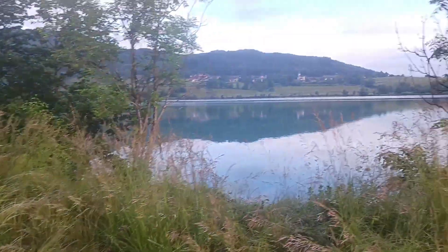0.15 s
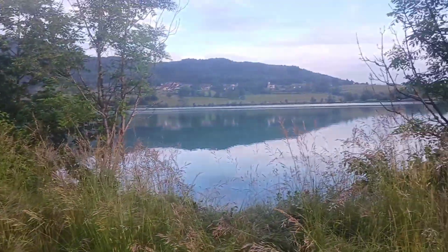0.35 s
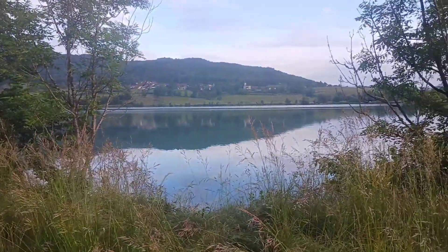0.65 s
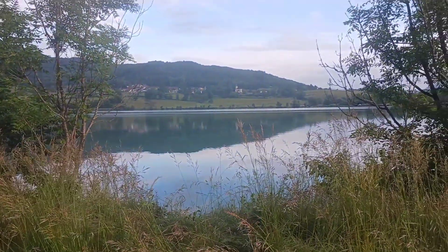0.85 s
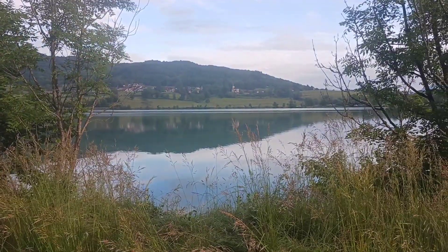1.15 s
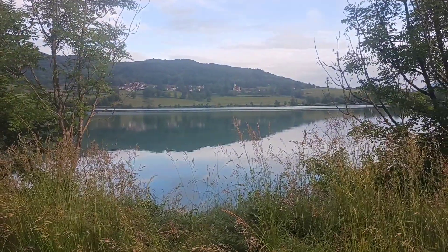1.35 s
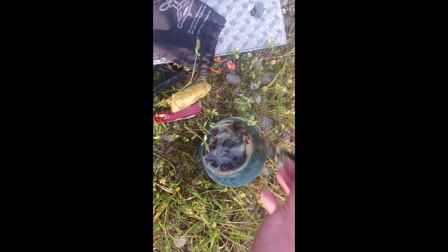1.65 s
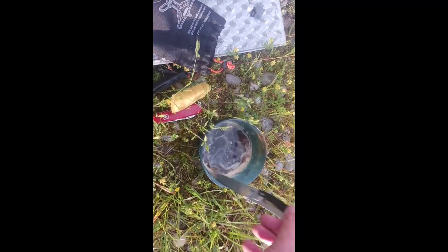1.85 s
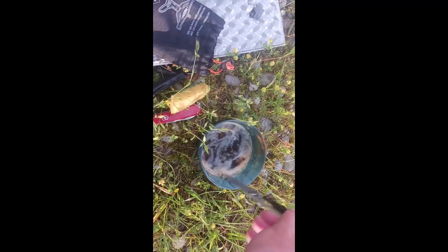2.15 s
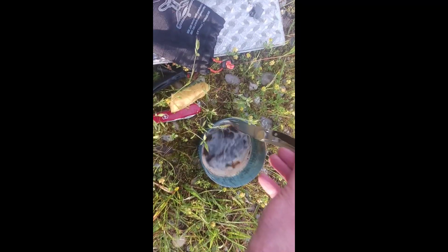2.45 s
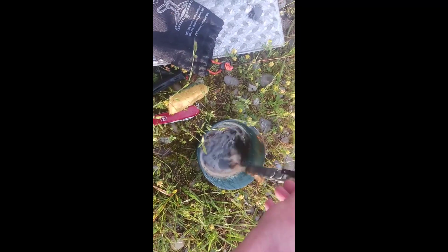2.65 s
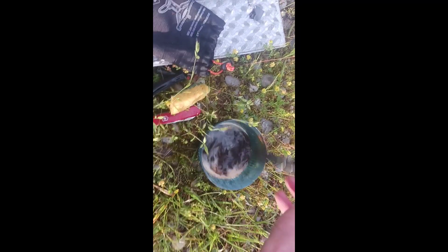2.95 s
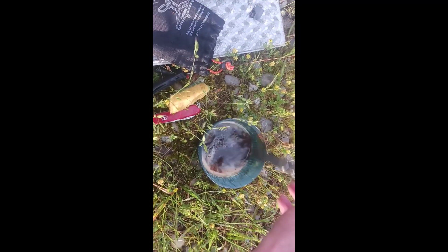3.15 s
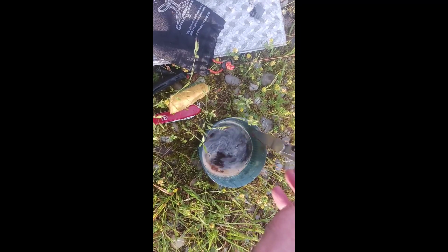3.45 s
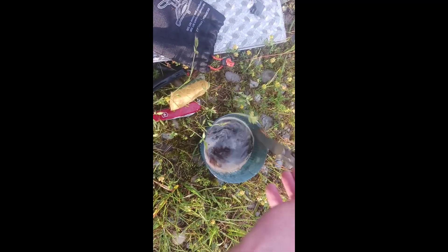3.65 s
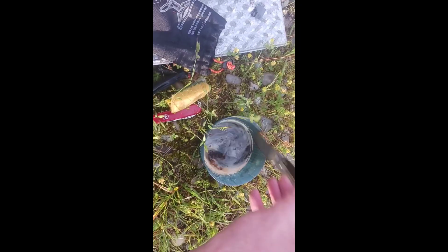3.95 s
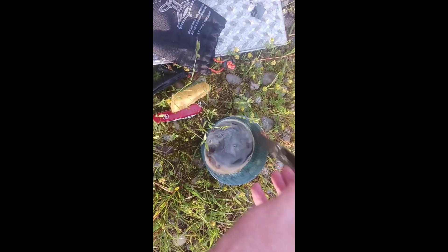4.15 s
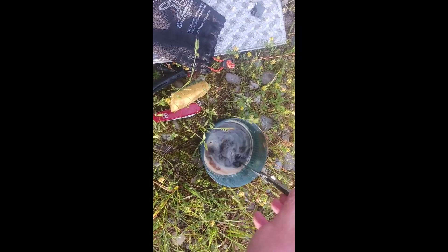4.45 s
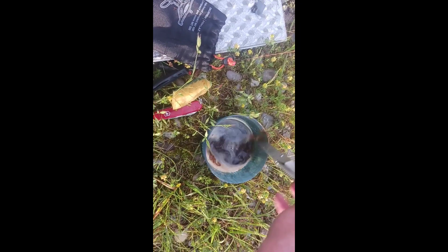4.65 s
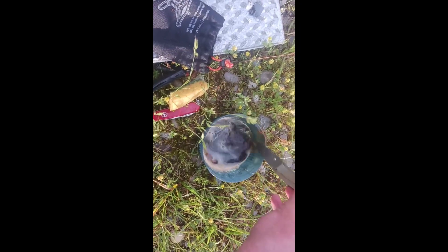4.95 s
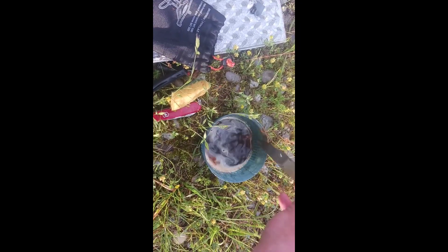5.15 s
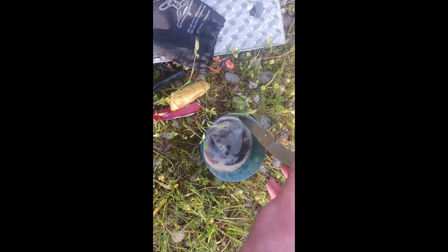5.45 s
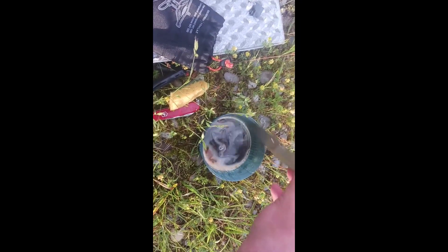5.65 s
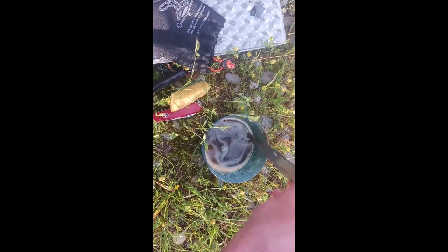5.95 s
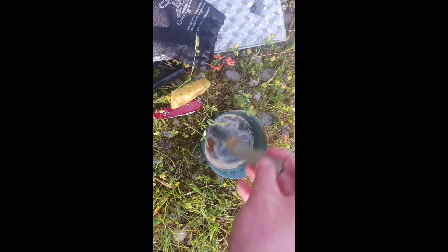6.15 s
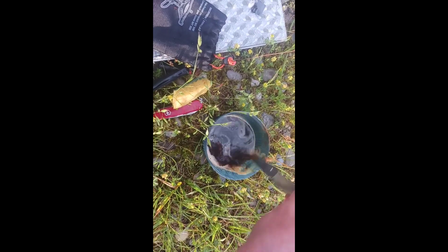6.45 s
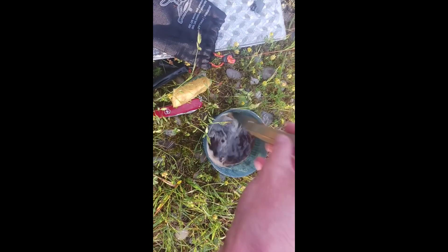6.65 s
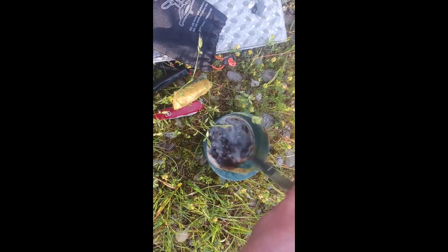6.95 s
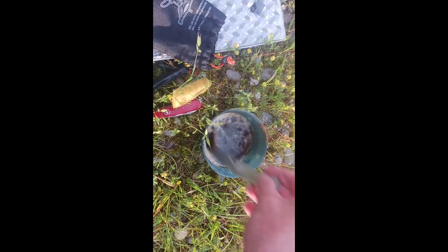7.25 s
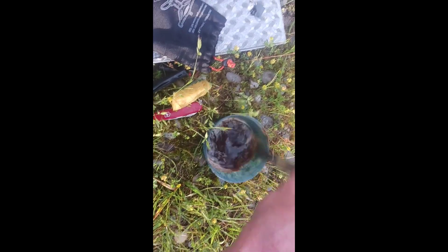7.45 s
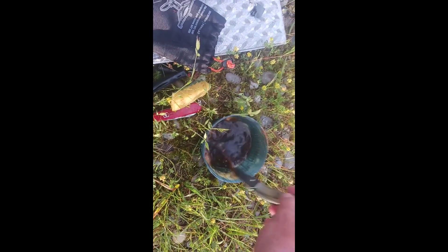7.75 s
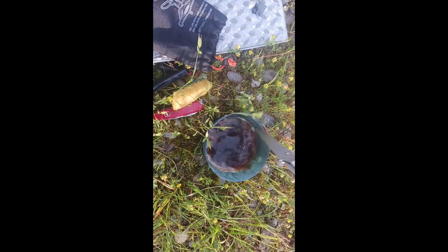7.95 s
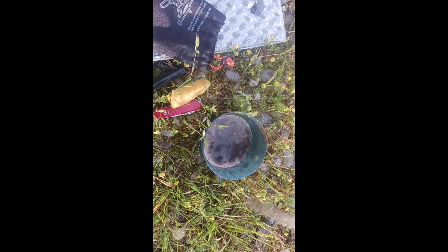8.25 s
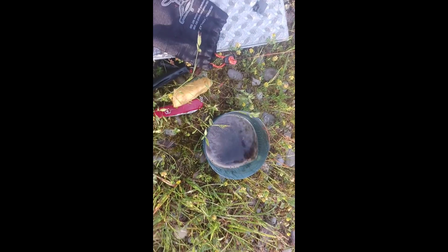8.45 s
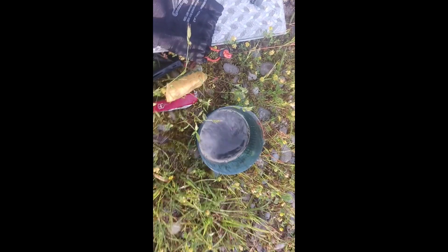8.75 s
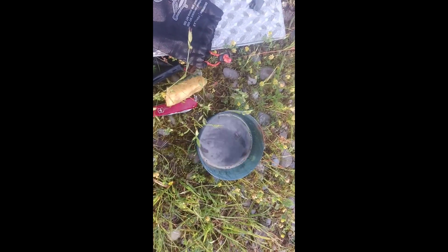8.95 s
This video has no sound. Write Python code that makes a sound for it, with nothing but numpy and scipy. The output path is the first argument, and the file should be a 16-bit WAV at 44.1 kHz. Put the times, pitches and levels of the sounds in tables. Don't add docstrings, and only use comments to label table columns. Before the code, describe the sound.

A soft lakeside ambience of wind and small whistling birds lasts about a second and a half, drops silent for an instant, then a steel spoon stirs a full plastic mug very close, slightly left. Gritty scrapes, damped knocks and short squeaky drags come in quick strokes, pausing briefly near four seconds. Behind, birds whistle and a far engine rumble grows; stirring stops just after eight seconds.

```python
import sys
import numpy as np
from scipy import signal
from scipy.io import wavfile
from scipy.ndimage import uniform_filter1d

SR = 44100
rng = np.random.default_rng(int(sys.argv[2]) if len(sys.argv) > 2 else 0)


def natural_amplitude(level_db):
    exponent = np.asarray(level_db, float) / 20
    return 10 ** exponent


def int16_out(signal):
    q = np.round(np.clip(np.atleast_2d(signal).T, -1, 1) * 32767)
    wavfile.write(sys.argv[1], SR, q.astype(np.int16))


N = 401310


def evened(x):
    return x / np.sqrt(np.mean(x ** 2) + 1e-20)


def read_spectrum(points, hz):
    f, value = np.transpose(points)
    return np.interp(np.log(hz + 1), np.log(f + 1), value)


def blend(table, at):
    key, *columns = np.transpose(table)
    return [np.interp(at, key, column) for column in columns]


def add(mix, s, sound):
    part = mix[..., round(s * SR):][..., :sound.shape[-1]]
    part += sound[..., :part.shape[-1]]


SCENE_CHANGE = (1.442, 1.471)
# time in seconds, rumble level in dB, wash level in dB.
AIR = [
    (1.47, -67, -71.5),
    (3.5, -66.5, -68.5),
    (4.4, -62, -67),
    (5.6, -59.5, -66.5),
    (6.2, -57.5, -63),
    (7.5, -53.5, -59),
    (8.3, -56, -63.5),
    (9.1, -55.5, -57.5),
]
# pitch in Hz, density in dB per Hz.
SHORE = [(20, -14), (70, 2.5), (400, -16), (624, -21), (962, -10), (2410, -25), (3520, -19), (8000, -31.5)]
SHORE_DB = -65.5
# pitch in Hz, density in dB per Hz.
RUMBLE = [(20, -19), (70, 3.5), (113, 4.5), (151, -0.5), (254, 1), (405, -17), (700, -27), (1100, -45)]
# pitch in Hz, density in dB per Hz.
WASH = [(290, -35), (500, -6.5), (760, -32), (1000, -6), (2600, -6), (7980, -19.5), (9600, -25.5),
        (16000, -14.5)]
# pitch in Hz, density in dB per Hz.
GRASS = [(2500, -18), (4000, -10), (5300, -2), (6500, -12.5), (8000, -8.5), (10000, -24), (13000, -14),
         (16500, -35)]
# start in seconds, length in seconds, level in dB.
RUSTLES = [
    (0.01, 0.61, -65.5),
    (1.287, 0.51, -69),
    (6.301, 0.1, -54.5),
    (7.978, 0.3, -63.5),
    (8.382, 0.37, -54.5),
    (8.894, 0.22, -65.5),
]
# pitch in Hz, left-right likeness from -1 to 1.
LIKENESS = [(60, 0.63), (180, 0.92), (550, 0.16), (1650, -0.26), (4970, 0.062), (15000, -0.13)]
# pitch in Hz, left over right in dB.
LEFT_LEAN = [(30, 5), (125, 1.5), (300, 3), (1000, 4.5), (2500, 10), (6000, 4), (15000, 6.5)]


def meadow():
    frames, hz = N // 256 + 5, np.fft.rfftfreq(1024, 1 / SR)
    a, b, c, d, wide, narrow = rng.standard_normal((frames, 513, 6)).T
    wide = evened(uniform_filter1d(uniform_filter1d(wide, 14, 0), 30, 1))
    narrow = evened(uniform_filter1d(narrow, 9, 1))

    t = np.arange(frames) * 256 / SR
    at_shore = t < SCENE_CHANGE[1]
    rumble_db, wash_db = blend(AIR, t)
    grass = np.zeros(frames)
    for start, length, db in RUSTLES:
        grass += natural_amplitude(db) * np.sin(np.pi * np.clip((t - start) / length, 0, 1)) ** 2
    levels = natural_amplitude(SHORE_DB) * at_shore, natural_amplitude(rumble_db) * ~at_shore, natural_amplitude(wash_db) * ~at_shore, grass
    power = 0
    for colour, level in zip((SHORE, RUMBLE, WASH, GRASS), levels):
        shape = evened(natural_amplitude(read_spectrum(colour, hz))) / np.sqrt(len(hz))
        power = power + np.outer(shape, level) ** 2
    drift = natural_amplitude(2.67 * wide + 0.46 * narrow * (hz < 350)[:, None])

    same = np.clip(read_spectrum(LIKENESS, hz), -1, 1)[:, None]
    left = a + 1j * b
    right = same * left + np.sqrt(1 - same ** 2) * (c + 1j * d)
    lean = natural_amplitude(np.outer(read_spectrum(LEFT_LEAN, hz) / 2, 1 - 0.52 * at_shore))
    z = np.array([left * lean, right / lean]) * np.sqrt(power) * drift
    return signal.istft(z, nperseg=1024, noverlap=768)[1][:, :N]


# pitch in Hz, level over the rumble in dB.
DRONE = [
    (62, -11.5),
    (116, -11),
    (190, -15.5),
    (255, -10.5),
]


def drone():
    t = np.arange(N) / SR
    slow = uniform_filter1d(uniform_filter1d(rng.standard_normal((len(DRONE), 2, N)), 5000), 5000)
    tones = np.zeros(N)
    for (hz, db), (pitch, strength) in zip(DRONE, evened(slow)):
        phase = 2 * np.pi * np.cumsum(hz * (1 + 0.05 * pitch)) / SR
        tones += natural_amplitude(db + 3.2 * strength) * np.sin(phase)
    rumble_db, _ = blend(AIR, t)
    return natural_amplitude(rumble_db) * (t > SCENE_CHANGE[1]) * tones * natural_amplitude([[0.8], [-0.8]])


def whistle(length, hz, db):
    u = np.linspace(0, 1, int(length * SR))
    pitch = np.polyval(np.polyfit([0, 0.5, 1], hz, 2), u)
    return natural_amplitude(db) * np.sin(2 * np.pi * np.cumsum(pitch) / SR) * signal.windows.tukey(len(u), 0.4)


# start in seconds, length in seconds, first pitch in Hz, last pitch in Hz, level in dB.
GLIDES = [(.01, 0.016, 4420, 4080, -60.5), (0.11, 0.025, 3580, 3520, -64), (0.2, 0.045, 3070, 3050, -66),
          (0.44, 0.025, 2900, 2730, -66), (0.442, 0.078, 4170, 4520, -66),
          (0.512, 0.049, 3250, 3064, -60.5), (0.559, 0.11, 3410, 3424, -64.5),
          (0.838, 0.043, 3730, 3380, -61.5), (0.863, 0.11, 4620, 4100, -70),
          (0.909, 0.083, 1915, 2124, -67.5), (0.986, 0.087, 3680, 3375, -60.5),
          (1.039, 0.033, 1950, 2125, -66), (1.239, 0.1, 1866, 1730, -69), (4.221, 0.16, 4370, 3900, -73),
          (0.291, 0.04, 2820, 2640, -66), (0.372, 0.069, 4300, 4200, -75), (0.505, 0.04, 4350, 4100, -68),
          (0.65, 0.05, 3170, 2780, -77), (0.719, 0.12, 2855, 2530, -75), (4.178, .025, 5800, 6500, -70),
          (.825, 0.023, 4970, 5650, -72), (0.954, 0.082, 4480, 4250, -77),
          (1.312, 0.059, 4370, 5460, -66.5), (1.362, 0.065, 4500, 4280, -72),
          (3.885, 0.03, 2440, 2880, -73), (4.026, 0.038, 3140, 2710, -56.5), (8.736, 0.05, 3630, 3610, -68),
          (8.806, 0.059, 4100, 3780, -62), (3.793, 0.012, 2700, 2860, -59), (5.165, 0.04, 3040, 3190, -58),
          (5.793, 0.12, 2600, 2730, -60.5), (8.165, 0.048, 3630, 3300, -59.5),
          (8.494, 0.052, 3270, 3470, -61), (8.65, 0.031, 3160, 3050, -58)]
# start in seconds, length in seconds, first, middle and last pitch in Hz.
BENDS = [(3.853, 0.024, 2250, 2870, 2720), (3.95, 0.064, 2950, 3230, 3180),
         (4.458, 0.039, 3300, 3230, 2980), (4.497, 0.092, 3150, 3400, 3340),
         (4.68, 0.076, 3320, 2960, 2700), (6.249, 0.052, 2710, 2680, 2400),
         (7.544, 0.062, 3350, 2800, 2560), (7.85, 0.053, 2080, 2405, 2060),
         (7.986, 0.057, 2800, 2840, 2520), (8.038, 0.061, 2420, 2880, 2990),
         (8.22, 0.077, 3290, 2940, 2480), (8.437, 0.093, 3460, 3140, 3300),
         (8.617, 0.032, 2190, 2300, 2740), (8.635, 0.072, 2680, 2710, 2290),
         (8.785, 0.045, 3650, 3500, 2500), (8.99, 0.051, 3790, 3690, 3680), (9.048, 0.11, 3230, 2990, 2670)]
# time in seconds, level in dB.
NEAR_BIRD = [(3.8, -64), (4.5, -66), (7.6, -64.5), (8.05, -60), (8.65, -61), (9.1, -67.5)]


def birds():
    near, distant, chorus = np.zeros((3, N))
    for s, length, first, last, db in GLIDES:
        add(distant, s, whistle(length, [first, (first + last) / 2, last], db + 3.5))
    for s, length, *hz in BENDS:
        add(near, s, whistle(length, hz, blend(NEAR_BIRD, s)[0] + 5))
    for when, long, high, bend, glide, loud in rng.random((300, 6)):
        hz = (2600 + 2800 * high) * np.array([1, 0.97 + 0.08 * bend, 0.85 + 0.25 * glide])
        add(chorus, when * N / SR, whistle(0.02 + 0.05 * long, hz, -80 + 8 * loud))

    t = np.arange(SR // 2) / SR
    echoes = rng.standard_normal((2, len(t))) * natural_amplitude(-60 * t / 0.25) * (t > 0.008)
    echoes /= np.linalg.norm(echoes[0])
    far = natural_amplitude(-5.5) * near + natural_amplitude(-5.0) * distant + chorus
    wet = signal.fftconvolve(far[None], echoes, axes=1)[:, :N]
    flutter = 1 + 0.9 * evened(uniform_filter1d(rng.standard_normal(N), 220))
    direct = near + natural_amplitude(-10.5) * flutter * distant
    return direct * natural_amplitude([[3], [-6]]) + natural_amplitude([[1.5], [-3]]) * wet


def rub(mix, s, length, db, first_hz, last_hz, width_hz, lean_db):
    u = np.linspace(0, 1, 6000)[:int(length * SR)] * 6000 / (length * SR)
    r = np.exp(-np.pi * width_hz / SR)
    noise = signal.lfilter([1], [1, -2 * r, r * r], rng.standard_normal((4, 6400)))
    a, b, c, d = noise[:, 400:400 + len(u)]
    turn = np.exp(2j * np.pi * np.cumsum(first_hz + (last_hz - first_hz) * u) / SR)
    near, other = evened(((a + 1j * b) * turn).real), evened(((c + 1j * d) * turn).real)
    far = natural_amplitude(-lean_db) * (0.43 * np.roll(near, 2) + 0.58 * other)
    swell = natural_amplitude(db) * np.sin(np.pi * np.clip(u, 0, 1)) ** 0.5
    add(mix, s, swell * np.array([near, far]))


# start in seconds, length in seconds, level in dB, pitch in Hz, left over right in dB.
CRUNCHES = [(1.477, 0.036, -51.5, 12700, 0), (2.881, 0.0036, -36, 14100, 9), (2.982, 0.037, -50, 12500, 8),
            (3.217, 0.006, -39.5, 7530, 13), (3.251, .02, -52, 13600, 11), (4.77, .04, -68, 12600, 12),
            (4.933, 0.023, -50, 13300, 9), (4.98, .009, -59, 14000, 9), (5.05, 0.017, -34, 14300, -1),
            (5.23, 0.037, -51, 12400, 6.5), (5.327, 0.004, -36, 13800, 5), (5.436, 0.012, -45, 13500, 14),
            (5.522, 0.023, -41.5, 9260, 7), (5.726, 0.024, -48, 13700, 11.5),
            (5.879, 0.0062, -35, 12400, 15), (5.889, 0.015, -49, 13700, 13),
            (6.023, 0.04, -47.5, 12200, 13), (6.647, 0.06, -53, 12500, 14), (6.887, 0.0099, -54, 12000, 11),
            (6.925, 0.02, -50, 13900, 12), (6.953, 0.011, -45, 11800, 14), (7.098, 0.021, -39.5, 12150, 6),
            (7.133, 0.0041, -44, 10700, 7), (7.313, 0.012, -46.5, 7640, 15),
            (7.506, 0.06, -47.5, 12400, 11), (7.62, .012, -51, 6500, 7), (7.632, 0.012, -38.5, 13100, 11),
            (7.633, 0.014, -47, 7830, 13)]
# start in seconds, length in seconds, level in dB, first pitch in Hz, last pitch in Hz.
SINGS = [(1.72, 0.07, -54, 5700, 5600), (2.16, 0.17, -45, 2000, 2476), (2.162, 0.18, -56, 2740, 2770),
         (2.204, 0.14, -50, 3750, 3940), (2.166, 0.18, -51.5, 1550, 1723),
         (2.247, 0.073, -40.5, 5350, 5330), (2.704, .022, -36.5, 4900, 5400),
         (3.164, 0.052, -44, 5300, 5450), (3.28, 0.081, -46.5, 2450, 2380), (3.36, 0.06, -67, 4650, 4560),
         (3.473, 0.077, -74, 4650, 4560), (3.515, 0.022, -45.5, 2830, 2850),
         (4.182, 0.043, -60, 2800, 2810), (5.114, 0.071, -61, 2750, 2800), (5.686, 0.039, -51, 2850, 2740),
         (6.542, 0.094, -51, 5600, 5550), (6.567, 0.097, -54, 2800, 2760), (7.04, 0.03, -55, 6200, 5070),
         (7.278, 0.033, -57, 5400, 4190)]


def grounds():
    out = np.zeros((2, N))
    for s, length, db, hz, lean_db in CRUNCHES:
        rub(out, s, length, db, hz, hz, 0.28 * hz, lean_db)
    for row in SINGS:
        rub(out, *row, width_hz=320, lean_db=3.2)
    return out


def ring(modes, spot, low_hz, high_hz, damping):
    t = np.arange(1200) / SR
    out = np.zeros(len(t))
    for (hz, width, db), (favour_db, detune) in zip(modes, spot):
        decay = np.sqrt(width) * np.exp(-np.pi * width * damping * t)
        out += natural_amplitude(db + favour_db) * decay * np.sin(2 * np.pi * hz * (1 + detune) * t)
    out = signal.sosfilt(signal.butter(8, low_hz, "high", fs=SR, output="sos"), out)
    out = signal.sosfilt(signal.butter(4, high_hz, fs=SR, output="sos"), out)
    return out / np.linalg.norm(out)


def shares(bottom_db, spoon_db, grit_db):
    bottom, spoon, grit = natural_amplitude(bottom_db), natural_amplitude(spoon_db), natural_amplitude(grit_db)
    rest = np.clip(1 - bottom ** 2 - spoon ** 2 - grit ** 2, 0.04, 1)
    return np.array([bottom, np.sqrt(rest), spoon, grit])


# level in dB, likeness to the near port from 0 to 1.
FAR_PORT = [
    (-7.5, 0.54),
    (-13.5, 0.47),
    (-7.5, 0),
    (-10.5, 0),
]


def both_ports(near, other, part):
    db, same = FAR_PORT[part]
    far = same * np.roll(near, 2) + np.sqrt(1 - same ** 2) * other
    return np.array([near, natural_amplitude(db) * far])


# pitch in Hz, width in Hz, level in dB.
BOTTOM = [(1150, 150, -4), (1550, 170, 0), (1400, 600, -4)]
# pitch in Hz, width in Hz, level in dB.
WALL = [(1950, 140, -4), (2400, 130, -1), (2750, 120, 3), (3100, 200, -8), (2500, 1100, -4)]
# pitch in Hz, width in Hz, level in dB.
SPOON = [(3770, 200, -3), (4550, 260, -2), (5480, 220, -1.5), (6200, 350, -7), (7300, 500, -14),
         (5000, 1800, -3)]
# pitch in Hz, width in Hz, level in dB.
GRIT = [(10600, 1000, -8), (12300, 800, -3), (13500, 800, 0), (15100, 900, 1)]
PARTS = (BOTTOM, WALL, SPOON, GRIT)


def strike(mix, s, near, other, gains, spot, parts, damping, low_hz):
    high_hz = (6850, 8640, 8330, 15460)
    for k, modes in enumerate(parts):
        lowest_hz = max(low_hz, 0.58 * PARTS[k][0][0])
        body = ring(modes, spot[k], lowest_hz, high_hz[k], damping)
        add(mix, s, signal.fftconvolve(gains[k] * both_ports(near, other, k), body[None], axes=1))


# spot number, share of bottom in dB, share of spoon in dB.
BLOW_SPOTS = [
    (0, 2, -25.5),
    (1, -5.5, -3.5),
    (2, -21, -10.5),
    (3, -28, 6.5),
]
# start in seconds, blow in dB, strongest bottom mode in Hz, strongest wall mode in Hz,
# spot 0-3.
KNOCKS = [(1.5332, -20, 1710, 2790, 1.9), (2.165, -23, 1860, 2700, 2.2), (2.3116, -25.5, 1540, 2320, 0.99),
          (2.6356, -26, 1530, 2370, 0.91), (2.8834, -6.5, 1290, 2730, 0.95), (2.969, -29, 1540, 2350, 0.8),
          (3.0797, -19, 1520, 2400, 1.06), (3.6191, -26, 1080, 2440, 1.95),
          (4.382, -11.5, 1440, 2785, 2.57), (4.3823, -18, 1330, 2730, .15), (5.0296, -25, 1190, 2570, 3.8),
          (5.0961, -31.5, 1320, 2800, .3), (5.3277, -14, 1455, 2670, 1.05), (5.881, -7, 1480, 2640, 0.85),
          (5.9034, -34, 1490, 2000, 0.38), (6.4072, -19.5, 1010, 2650, 0.54),
          (6.4103, -10.5, 1396, 2560, 0.964), (7.3072, -22, 1220, 2000, 0.1),
          (7.3351, -18, 1100, 2520, 1.43), (7.355, -32, 1880, 2250, 2), (7.5168, -21.5, 1260, 2720, 0.88),
          (7.5485, -32, 1160, 2770, .1), (7.6999, -33, 1190, 2430, 0.14), (7.8265, -30, 1210, 2150, 0.14)]
# start in seconds, blow in dB, spot 0-3.
TICKS = [(0.798, -49, 1.5), (2.568, -36.5, 0.09), (2.7114, -28, 3.5), (3.2, -29, 3.5), (2.594, -32, 0.38),
         (2.762, -26.5, 1.04), (3.411, -29, 2.53), (3.4204, -26, 2.8), (3.5187, -43, 2), (4.446, -34, .05),
         (4.662, -32.5, 1.2), (5.3055, -35.5, 0.045), (5.396, -34, 2.48), (5.529, -52, 3.5),
         (5.8002, -32.5, 2.54), (6.1865, -33.5, 2.52), (6.5324, -37.5, .05), (7.379, -30, 0.44),
         (6.81, -33.5, 2.45), (7.003, -35.5, 0.89), (7.169, -36, 0.3), (7.206, -45, 3.6),
         (7.4753, -28, 0.38), (7.7665, -32.5, 1.5), (6.613, -31, 2.66)]
# start in seconds, blow in dB, spot 0-3.
CHATTER = [(1.6087, -40.5, 0.17), (2.399, -33, 2), (3.1067, -28, 1.8), (3.1835, -35, 3.6),
           (3.278, -27, 2.5), (3.338, -31, 1.7), (3.4405, -46, 2), (3.5533, -49, 2), (4.3863, -24.5, 1.94),
           (4.417, -50, 0.55), (4.558, -37, 2.36), (4.5704, -46, 3.1), (4.579, -40, 3), (4.5858, -36, 1.6),
           (4.5916, -35, 1.4), (4.5976, -33, 1.1), (4.604, -35, 2), (4.611, -27.5, 1.7), (4.617, -27, 1.23),
           (4.6204, -39, 3.1), (4.7248, -39.5, 2.27), (4.853, -34, 1.4), (4.8582, -36, 1.4),
           (4.866, -31, 1.6), (4.875, -40, 2), (5.36, -34, 2.6), (5.428, -29, 1.7), (5.8902, -35, 1.9),
           (6.4177, -49, 3.5), (6.782, -49, 3.4), (6.942, -40, 2.6), (6.958, -35, 2.8), (7.5128, -24.5, 2),
           (7.5227, -21, 2.1), (7.611, -40, .2), (7.402, -45, 1.9)]
USUAL_BOTTOM_HZ, USUAL_WALL_HZ = 1540, 2650
ALL_BLOWS = KNOCKS + [(s, db, USUAL_BOTTOM_HZ, USUAL_WALL_HZ, spot) for s, db, spot in TICKS + CHATTER]
# pitch in Hz, width in Hz, level in dB.
KNOCK_CRACK = (4360, 340, 1)
KNOCK_GRIT_DB = -18
# start in seconds, level in dB.
JOLTS = [
    (2.8834, -54),
    (4.382, -47.5),
    (4.444, -57),
    (5.3267, -64),
    (5.881, -52.5),
    (6.409, -44.5),
    (7.335, -57),
    (7.7, -58),
]


def knocks():
    out, t = np.zeros((2, N)), np.arange(600) / SR
    rattle = rng.standard_normal((len(ALL_BLOWS), 2, 600)) * natural_amplitude(-60 * t / 0.04) * 0.075
    spots = rng.standard_normal((len(ALL_BLOWS), 4, 7, 2)) * [2, 0.01]
    for (s, db, bottom_hz, wall_hz, where), (near, other), spot in zip(ALL_BLOWS, rattle, spots):
        bottom_db, spoon_db = blend(BLOW_SPOTS, where)
        grit_db = spoon_db + KNOCK_GRIT_DB + 0.3 * (db + 10)
        near = near + (t == 0) * 1.9
        gains = natural_amplitude(db + 11) * shares(bottom_db, spoon_db, grit_db) / np.linalg.norm(near)
        bottom = [(bottom_hz, 110, 7)] + BOTTOM[::2]
        wall = [(wall_hz, 120, 4)] + WALL[:2] + WALL[-1:]
        parts = bottom, wall, [KNOCK_CRACK] + SPOON, GRIT
        low_hz = max(0.83 * bottom_hz, 930)
        strike(out, s, near, 2.4 * other, gains, spot, parts, damping=1.5, low_hz=low_hz)
    thump = np.sin(2 * np.pi * 480 * t) * natural_amplitude(-60 * t / 0.022)
    for s, db in JOLTS:
        add(out, s, natural_amplitude(db) * thump * natural_amplitude([[3], [-3]]))
    return out


# lie number, shares of bottom, spoon and grit in dB.
DRAG_LIES = [
    (0, -87, -1, -11.5),
    (1, -17, -8, -26),
    (2, 2, -4.5, -19.5),
    (3, -13.5, -2.5, -10),
    (4, -62, -1.5, 10.5),
]
# start in seconds, length in seconds, pressure in dB, lie 0-4.
STROKES = [(1.483, 0.028, -51, 2.37), (1.527, 0.012, -40.5, 2.66), (1.562, 0.11, -59, 2.86),
           (1.718, 0.057, -41, 2.98), (1.784, 0.065, -49, 0.61), (1.85, 0.078, -49.5, 0.24),
           (2.111, 0.046, -49.5, 0.019), (2.161, 0.028, -46, 1.2), (2.19, 0.14, -46, 1.04),
           (2.258, 0.054, -42, 0.04), (2.338, 0.14, -52, 0.17), (2.563, 0.097, -48, 2.58),
           (2.595, 0.24, -55.5, 0.4), (2.678, 0.01, -67, 0.25), (2.704, 0.027, -39.5, 0.014),
           (2.74, 0.028, -42, 1.3),
           (2.88, 0.042, -40.5, 2.45), (2.96, 0.055, -40, 2.94), (3.075, 0.036, -35, 2.73),
         (3.169, 0.06, -41, 0.47), (3.259, 0.051, -42, 0.18), (3.32, 0.04, -46, 1.69),
         (3.406, 0.055, -41, 3), (3.534, 0.042, -37, 0.077), (3.613, 0.034, -45, 2.5),
         (3.659, 0.013, -39.5, 1.27), (3.715, 0.033, -55.5, 2.9), (3.868, 0.046, -62.5, 0.16),
         (3.945, 0.14, -65, 0.44), (4.101, 0.035, -51, 0.81), (4.166, 0.057, -56.5, 3.14),
           (4.38, 0.045, -59, 2.2), (4.446, 0.0036, -50.5, 2), (4.573, 0.065, -51, 1.36),
         (4.625, 0.055, -60.5, 2.8), (4.753, 0.05, -44, 3.05), (4.848, 0.021, -44, 2.05),
         (4.889, 0.051, -45, 2.85), (5.002, 0.058, -40, 3.03), (5.103, 0.065, -48, 3.22),
         (5.222, 0.053, -45, 3.05), (5.327, 0.024, -42, 2.95), (5.41, 0.051, -44, 2.74),
         (5.514, 0.031, -43, 3.23), (5.591, 0.046, -51.5, 3.03), (5.675, 0.05, -49.5, 3.32),
         (5.717, 0.04, -63, 2.3),
           (5.878, 0.024, -46.5, 2.05), (5.992, 0.074, -44.5, 2.92), (6.107, 0.021, -53.5, 2.55),
          (6.181, 0.034, -54.5, 2.7), (6.313, 0.11, -55, 2.9), (6.399, 0.063, -51.5, 2),
          (6.524, 0.083, -50, 2.8), (6.614, 0.012, -36.5, 3.02), (6.648, 0.07, -54, 2.8),
          (6.767, 0.031, -52, 3.15), (6.903, 0.068, -45, 2.98), (7.068, 0.073, -44, 3.17),
          (7.271, 0.033, -54, 2.96), (7.322, 0.045, -42, 2.9), (7.468, 0.022, -49, 2.07),
          (7.499, 0.063, -43.5, 2.84), (7.62, 0.038, -48.5, 2.6), (7.687, 0.012, -59, 2.05),
          (7.722, 0.11, -49, 2.77), (7.82, 0.03, -53.5, 2)]
ALL_DRAGS = STROKES


def scrape():
    out = np.zeros((2, N))
    spots = rng.standard_normal((len(ALL_DRAGS), 4, 6, 2)) * [4, 0.024]
    skips = evened(uniform_filter1d(rng.standard_normal((5, N)), 350, 1))
    judder = natural_amplitude(1.5 * skips[0] + 2.8 * skips[1:])
    grain = natural_amplitude(2.7 * np.minimum(rng.exponential(1, N), 3.5))
    grain *= rng.random(N) < 7000 / SR
    slips = evened(grain) * rng.standard_normal((2, N))
    landings = np.array([row[0] for row in KNOCKS + TICKS])
    peaks = np.array([[0.4], [0.45], [0.55], [0.62]])
    lead = 0.045

    for (s, length, db, lie), spot in zip(ALL_DRAGS, spots):
        t = np.arange(-lead, length + 0.1, 1 / SR)
        off = np.maximum(-t, 0) + np.maximum(t - length, 0)
        edges = 0.82 * natural_amplitude(-550 * off) + 0.13 * natural_amplitude(-170 * off)
        swell_db = db - np.minimum(22 * (t / length - peaks) ** 2, 14)
        gains = edges * natural_amplitude(swell_db) * shares(*blend(DRAG_LIES, lie))[:, None]
        gains *= signal.windows.tukey(len(t), 1600 / len(t))
        landing = landings[np.argmin(abs(landings - s))] - s
        gains *= (t > landing) | (abs(landing) > 0.006)
        at = slice(round(s * SR), round(s * SR) + len(t))
        near, other = slips[:, at]
        strike(out, s - lead, near, other, gains * judder[:, at], spot, PARTS, damping=0.9, low_hz=1160)
    return out


def scene():
    air = birds() + meadow()
    mug = grounds() + scrape() + knocks()
    return air + natural_amplitude(1.5) * mug + drone()


def band_limit(x):
    return signal.sosfilt(signal.butter(12, 16550, fs=SR, output="sos"), x)


def record(dry):
    t = np.arange(N) / SR
    closing = (SCENE_CHANGE[0] - t) / 0.0018
    opening = (t - SCENE_CHANGE[1]) / 0.0029
    gate = np.clip(np.maximum(closing, opening), 0, 1)
    edged = signal.sosfilt(signal.butter(3, 42, "high", fs=SR, output="sos"), dry * gate)
    edged = signal.oaconvolve(edged, signal.firwin(151, 15400, fs=SR)[None], "same", axes=1)
    return band_limit(edged)


dry = scene()
out = record(dry)
int16_out(out)
```